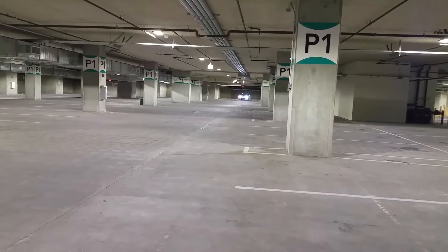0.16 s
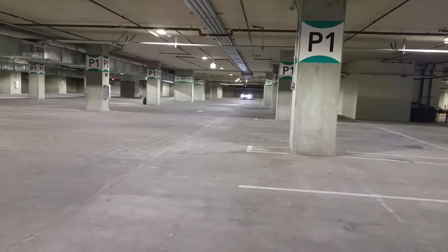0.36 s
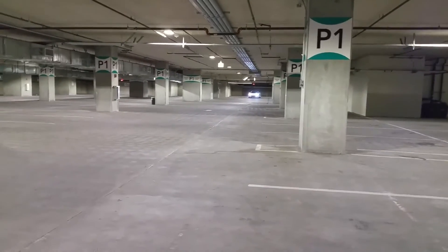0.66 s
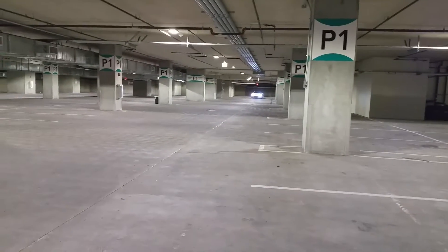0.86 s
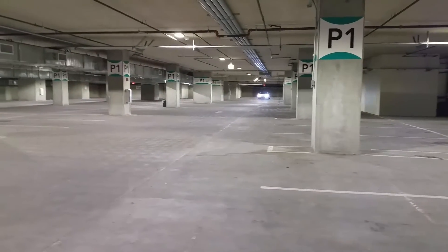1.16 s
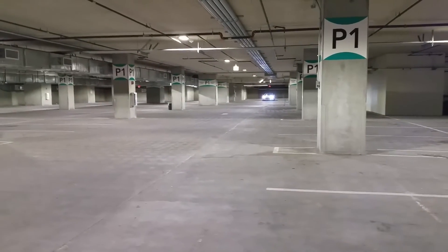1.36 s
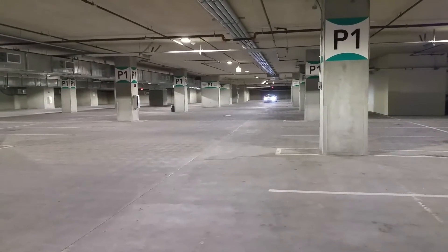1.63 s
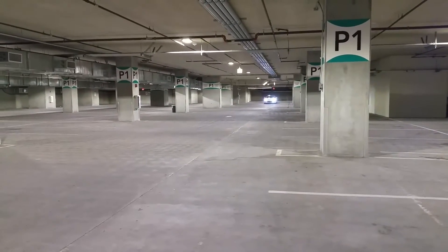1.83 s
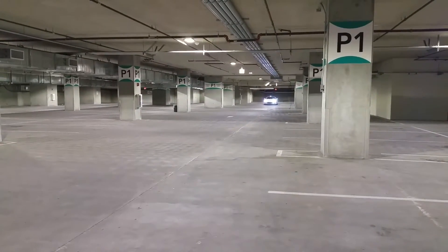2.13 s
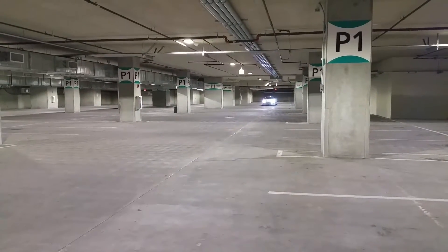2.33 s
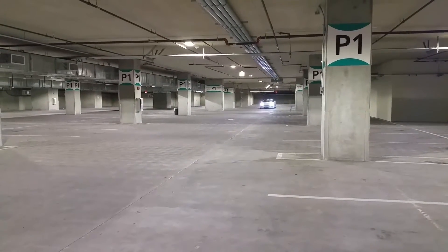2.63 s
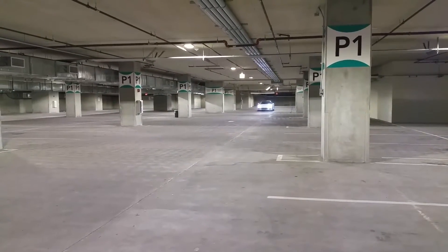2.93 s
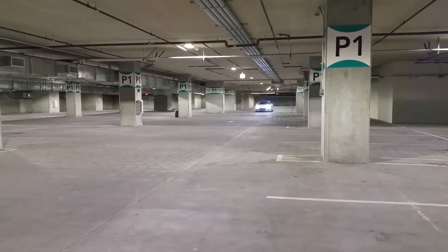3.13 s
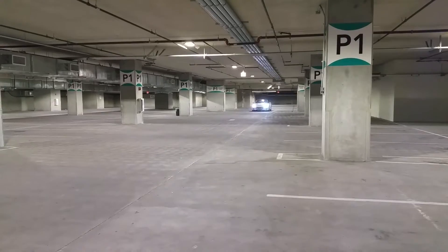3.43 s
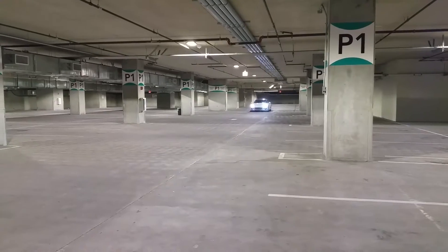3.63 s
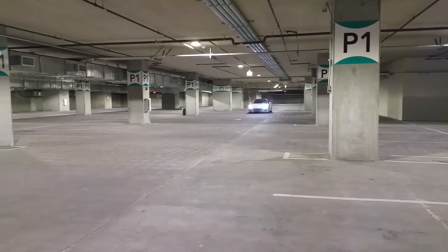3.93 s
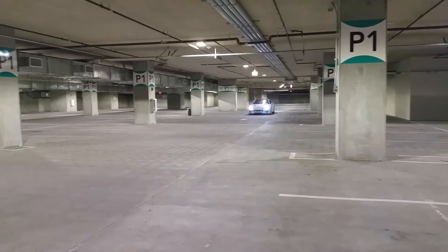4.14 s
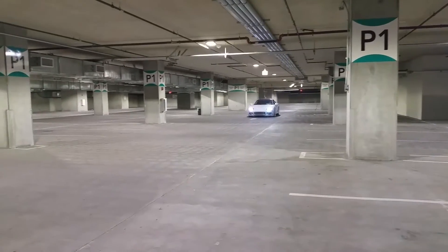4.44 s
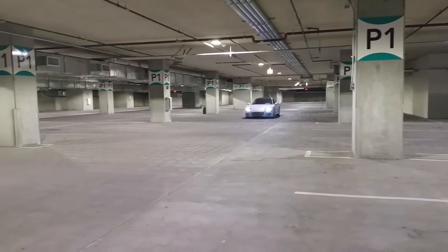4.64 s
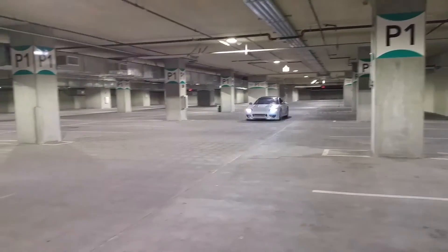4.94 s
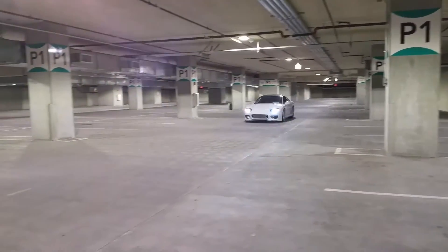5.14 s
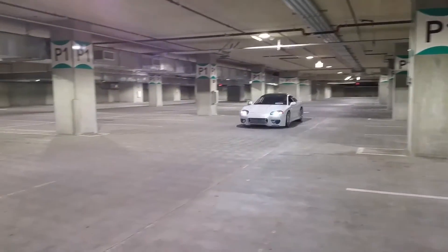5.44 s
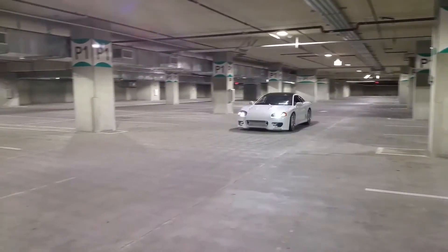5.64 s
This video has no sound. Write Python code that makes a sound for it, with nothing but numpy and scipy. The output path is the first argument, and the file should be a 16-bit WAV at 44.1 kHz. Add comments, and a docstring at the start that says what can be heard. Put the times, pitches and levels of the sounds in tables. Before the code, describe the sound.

In an empty concrete garage, a distant car engine drones low, climbs through first gear, then releases a bright whistling spray of boost. Second gear bites with a throaty cough and faint click, revs climb again, and another brighter whistle follows. The engine falls in pitch while tyre hum and drumming swell close to a stereo microphone amid long echoes.

```python
"""A turbocharged V6 comes down an empty concrete parking garage toward a two-port microphone.
Far off, an unsteady engine speed drives exhaust tones and puffs; tyre roar and rushing air are noise.
It pulls through first gear, and after the lift an escaping jet of boost whistles, sprays and sighs.
Second gear bites with a cough, a faint bright click follows, and the second lift whistles brighter.
Last, tread hum and drumming swell up close; the concrete's long decaying echo washes over the car."""
import sys
import numpy as np
from scipy import signal
from scipy.fft import rfft, irfft
from scipy.io import wavfile
from scipy.ndimage import uniform_filter1d, minimum_filter1d

SR = 44100
rng = np.random.default_rng(int(sys.argv[2]) if len(sys.argv) > 2 else 0)


def persist_wave(psi):
    """Save psi, clipped to +-1, as 16-bit WAV."""
    counts = np.round(np.clip(psi, -1, 1) * 32767).astype(np.int16)
    wavfile.write(sys.argv[1], SR, np.atleast_2d(counts).T)


N = 254853

# Echo of the garage. Each row: frequency in Hz, time to die by 60 dB in seconds.
GARAGE_DECAY = [(60, 3.8), (250, 2.8), (1000, 3.4), (3000, 1.7), (6500, 1.75), (13000, .7)]
# Likeness of diffuse sound at the two ports. Each row: frequency in Hz, likeness from 0 to 1.
PORT_LIKENESS = [(30, .99), (60, .987), (120, .965), (240, .9), (480, .66), (960, .17), (1900, .03),
                 (8000, 0)]
# Treble balance of the microphone ports. Each row: frequency in Hz, left minus right in dB.
PORT_BALANCE = [(60, 1.1), (500, .9), (900, -.5), (1600, -1), (2600, -4.5), (3600, -7.5), (4700, -11),
                (6500, -8), (7500, -5), (8700, -.3), (15000, 0)]
# Loudness curve shared by tyres and exhaust: rises as the car comes, then dips and recovers.
# Each row: time in seconds, relative level in dB.
SHARED_LOUDNESS = [(0, -24), (1.3, -10), (2.5, -1.5), (3.3, 2.5), (3.52, -2), (4.02, 3.5), (4.45, -8.5),
                   (4.72, 0.5), (5.3, -4), (5.78, 3.5)]

# Rushing air. Each row: time in seconds, level in dB.
AIR_LEVEL = [(0, -48), (.6, -42), (1.3, -40), (2.15, -31.5), (2.62, -25), (3.2, -24), (3.55, -30.5),
             (4.15, -26), (4.75, -25.5), (5.35, -30), (5.78, -30)]
# Fine treble hiss, which rises, drops out and returns. Each row: time in seconds, level in dB.
FINE_HISS_LEVEL = [(0, -60), (2.65, -41), (3.3, -54.5), (3.7, -41.5), (4.2, -36.5), (5.78, -41)]
# Spectra of the air and the fine hiss. Each row: frequency in Hz, relative density in dB per Hz.
AIR_COLOUR = [(40, -12), (250, -5.5), (900, -3), (1650, -1), (2200, 2), (2700, -3), (3500, -2), (4500, -4),
              (5500, -6.5), (6300, -11), (7100, -28), (8200, -82), (12000, -61)]
FINE_HISS_COLOUR = [(4000, 15), (7000, 13), (8500, 8.5), (10500, 2), (12000, -1.5), (15500, -10)]

# Hum of the tyre tread, growing as the car comes close. Each row: time in seconds, level in dB.
TREAD_LEVEL = [(0, -87), (4.3, -33.5), (5.1, -30), (5.6, -27.5), (5.78, -29)]
# Spectra of tyre roar, tread hum and the tyres' drumming on the concrete.
# Each row: frequency in Hz, relative density in dB per Hz.
TYRE_COLOUR = [(30, -11), (110, -4), (250, 0), (550, -6), (750, -2.5), (1000, -1.5), (1300, -5.5),
               (1650, -9), (2100, -10), (3000, -20), (8000, -87)]
TREAD_COLOUR = [(400, -48), (650, 2.5), (850, 6), (1050, 7), (1400, -0.5), (2500, -43), (6000, -60)]
DRUM_COLOUR = [(200, -45), (275, -11), (325, -0.5), (410, -9), (500, -36), (4000, -89.5)]
TYRES_DB, DRUM_OVER_TREAD_DB = -23.5, 2.5  # the roar is relative to the shared loudness

# Thin whines, chirps and a faint, nearly steady hum near 1.6 kHz.
# Each row: start in seconds, length in seconds, start pitch in Hz, end pitch in Hz, level halfway in dB,
# swell from start to end in dB, blur as a share of the start pitch.
WHINES = [(0, 1, 5670, 5770, -56.5, 0, 0.051), (0, 1.0, 1620, 1677, -51, 5, 0.11),
          (2.497, 0.098, 4500, 4320, -39, 8, .025), (4.171, 0.14, 1290, 1127, -30, 0, 0.08),
          (4.134, 0.148, 2296, 2178, -32.5, -3, 0.044), (4.796, 0.93, 6820, 6450, -41.5, -10, 0.045),
          (4.88, 0.92, 14300, 7640, -58, 14, 0.052)]
WHINE_FADE_SHARE = .12  # of the length, at each end

# Blow-off whistle, one row a gear change; the top octave is duller from far away.
# Each row: start in seconds, length in seconds, pitch it sinks to in Hz, quick drop as the valve lifts
# in Hz, sinking time in seconds, level before the fade in dB, top octave in dB.
BLOW_OFFS = [(2.572, 0.78, 6155, 439.4, 0.27, -12, -3.5), (4.161, 0.83, 6124, 230.8, .31, -12, 3)]
# Sigh of the escaping air. Each row: frequency in Hz, relative density in dB per Hz.
SIGH_COLOUR = [(2000, -50), (4300, 0), (5700, 3.5), (6400, 1), (7200, 2.5), (8200, -15), (9400, -20),
               (10500, -10.5), (12000, -24), (15500, -44)]
VALVE_OPENS_S, VALVE_CLOSES_S, BOOST_FADE_DB_PER_S = .012, 0.073, 30.5
SNAP_S = 0.021  # the pitch drops fast as the valve lifts
SAG_HZ = 641  # then holds briefly and sinks with the boost pressure
# the valve bounces on its spring and bends the pitch
REBOUND_HZ, REBOUND_PERIOD_S, REBOUND_DIES_S = 102.3, 0.16, 0.254

# Engine speed through first and second gear.
# Each row: time in seconds, mean firing rate of one cylinder bank in Hz.
BANK_RATE = [(0, 25), (.2, 29.5), (.5, 29.5), (.87, 34.5), (1.15, 41.5), (1.45, 49.5), (1.7, 59),
             (1.95, 64), (2.15, 69), (2.52, 86), (2.75, 65), (3.2, 61), (3.55, 65), (3.85, 70.5), (4.1, 76),
             (4.4, 77.5), (4.8, 76.5), (5.08, 70), (5.3, 66), (5.5, 61), (5.78, 52)]
# The throttle, one row a gear. Each row: starts to open in seconds, starts to close in seconds,
# closing time in seconds.
PULLS = [(1.17, 2.245, 0.57), (3.09, 4.15, 0.05)]
THROTTLE_OPENS_S = 0.5

# Tones in the echoing rumble. Each row: multiple of the bank rate, relative level in dB.
ORDER_LEVELS = [(1, 5.5), (2, -5), (3, -8), (4, -6.5), (5, -10.5), (6, -16), (9, -17)]
# Spectrum of the exhaust rumble. Each row: frequency in Hz, relative density in dB per Hz.
EXHAUST_COLOUR = [(20, -39), (38, -42), (52, -12.5), (68, -17), (92, 0.5), (125, 1), (155, 3.5),
                  (195, 11.5), (270, 0), (360, -8), (450, -7), (600, -13), (850, -18.5), (1600, -25.5),
                  (5000, -71)]
# Borders between boom, drone, growl and rasp: frequencies in Hz.
REGISTER_EDGES_HZ = [95, 170, 260]
# Bass boom under the drone. Each row: time in seconds, level in dB.
BOOM_LEVEL = [(0, -43), (.9, -28.5), (1.6, -26.5), (2.4, -34), (2.72, -39), (3.3, -27.5), (4.0, -42),
              (4.35, -48), (4.95, -55), (5.3, -43), (5.78, -38)]
# Drone, growl and rasp above the boom. Each row: base level in dB, share of the shared loudness,
# gain at full throttle in dB.
REGISTERS = [(-27.5, 0.017, 5.5), (-28, 0.43, 3.5), (-25, 0.47, 2.5)]

# The three lowest exhaust tones, at 1, 2 and 3 times the bank rate, swell and dip as the car moves
# through the hall. Each row: time in seconds, mean level in dB.
BANK_TONE = [(0, -70), (1.9, -46), (2.18, -32), (2.55, -27), (2.8, -47), (3.4, -51), (3.75, -24),
             (4.05, -25), (4.3, -36), (4.65, -30), (4.92, -35), (5.1, -25), (5.45, -24.5), (5.7, -21)]
FIRING_TONE = [(0, -30), (.22, -25), (.37, -34), (.46, -17.5), (.61, -29.5), (.7, -21), (.87, -17.5),
               (1.0, -17.5), (1.1, -25), (1.5, -22.5), (1.66, -20.5), (1.97, -16.5), (2.25, -20),
               (2.38, -27), (2.95, -41), (3.2, -24.5), (3.42, -21.5), (3.58, -16.5), (3.85, -18.5),
               (3.98, -27), (4.12, -20), (4.3, -29.5), (4.55, -26), (4.8, -37), (5, -24.5), (5.2, -29),
               (5.78, -52)]
GROWL_TONE = [(0, -65), (1, -37), (1.55, -30.5), (1.9, -26), (2.2, -22), (2.4, -34), (2.9, -26.5),
              (3.3, -41), (3.55, -19), (3.75, -25), (3.93, -19), (4.15, -31), (4.35, -32), (4.6, -27),
              (4.75, -43), (5.78, -33)]
# uneven firing frays each tone: level when coasting, extra at full throttle, spread per multiple
RAGGED_DB, RAGGED_LOAD_DB, RAGGED_HZ = -11, 2.5, 9
SURGE_DB, SURGE_HZ = 1.0, 8

# Bark of the tailpipe as the revs climb under load.
# Each row: frequency in Hz, relative density in dB per Hz.
BARK_COLOUR = [(100, -52), (200, -26), (260, 6.5), (330, -9), (430, -0.5), (520, -4.5), (700, -10.5),
               (1100, -13), (2000, -40), (8000, -96)]
# level at full throttle and this bank rate, and its slope with the rate
BARK_DB, BARK_FULL_HZ, BARK_DB_PER_HZ = -24.5, 74, 0.52
COUGH_AT_S, COUGH_S, COUGH_DB = 3.27, 0.064, -26.5

TIME = np.arange(N) / SR
BINS = np.fft.rfftfreq(N, 1 / SR)  # Hz


def gain_of(db):
    """Decibels to amplitude."""
    return 10 ** (np.asarray(db) / 20)


def evened(x):
    """Scales to rms 1."""
    return x / np.sqrt(np.mean(x ** 2) + 1e-20)


def read(points, hz):
    """Reads a spectrum table on a log-frequency axis."""
    f, value = np.transpose(points)
    return np.interp(np.log(hz + 1), np.log(f + 1), value)


def curves(rows):
    """The columns of a time table, one value a sample."""
    s, *columns = np.transpose(rows)
    return [np.interp(TIME, s, c) for c in columns]


def ramp(start, seconds):
    """Rises from 0 to 1, beginning at start."""
    return np.clip((TIME - start) / seconds, 0, 1)


def coloured(x, points):
    """Filters by a spectrum table."""
    return irfft(rfft(x) * gain_of(read(points, BINS)), N)


def wander(hz):
    """Smooth chance of rms 1, mostly slower than hz."""
    return evened(irfft(rfft(rng.standard_normal(N)) / (1 + (BINS / hz) ** 4), N))


def fuzzy(phase, width_hz):
    """A narrow band of turbulence around a gliding tone, rms about 1."""
    return wander(width_hz) * np.sin(phase) + wander(width_hz) * np.cos(phase)


def steadied(x, seconds):
    """Takes the slow swells out of a stereo sound, leaving rms about 1."""
    power = uniform_filter1d((x ** 2).mean(0), max(int(seconds * SR), 1))
    return x / np.sqrt(abs(power) + 1e-12)


def diffuse():
    """Noise from all sides: alike at both ports in the bass, unrelated in the treble."""
    left, other = rfft(rng.standard_normal((2, N)))
    same = np.clip(read(PORT_LIKENESS, BINS), -1, 1)
    right = same * left + np.sqrt(1 - same ** 2) * other
    return irfft(np.array([left, right]), N)


def garage(x, direct_db):
    """The straight path plus a dense tail in which each band dies at its own speed."""
    hz, t, z = signal.stft(diffuse()[:, :2 * SR], SR, nperseg=512)
    decay_db = -60 * t / read(GARAGE_DECAY, hz)[:, None]
    tail = signal.istft(z * gain_of(decay_db), SR, nperseg=512)[1]
    tail = tail / np.linalg.norm(tail[0])
    echo = signal.fftconvolve(x[None], tail, axes=1)[:, :N]
    direct = gain_of(direct_db)
    return (direct * x + echo) / np.sqrt(1 + direct ** 2)


def rush(colour, level_db):
    """A turbulent roar that the concrete has scattered to all sides."""
    flutter_db = .3 * wander(14)
    return evened(coloured(diffuse(), colour)) * gain_of(level_db + flutter_db)


def air():
    """Rushing air and a fine treble hiss, both noise from all sides."""
    rushing = rush(AIR_COLOUR, curves(AIR_LEVEL)[0])
    return rushing + rush(FINE_HISS_COLOUR, curves(FINE_HISS_LEVEL)[0])


def tyres():
    """A broad roar all the way; tread hum and drumming on the concrete once the car is close."""
    roar = rush(TYRE_COLOUR, TYRES_DB + curves(SHARED_LOUDNESS)[0])
    tread_db = curves(TREAD_LEVEL)[0]
    tread = evened(coloured(rng.standard_normal(N), TREAD_COLOUR)) * gain_of(tread_db)
    drumming = rush(DRUM_COLOUR, tread_db + DRUM_OVER_TREAD_DB)
    return roar + garage(tread, direct_db=-4.0) + drumming


def click(s=3.407, level_db=-33, ring_s=0.00054):
    """A faint bright click: a tiny burst of high noise without echo."""
    age = TIME - s
    snap = (age >= 0) * np.exp(-abs(age) / ring_s) * rng.standard_normal(N)
    return gain_of(level_db) * coloured(snap, [(2000, -17), (7000, 5), (15000, -3)])


def whine(start, length, from_hz, to_hz, level_db, swell_db, spread):
    """A thin tone blurred into a narrow band of noise: fades in, glides, fades out."""
    along = ramp(start, length)
    hz = from_hz + (to_hz - from_hz) * along
    fade = np.minimum(np.minimum(along, 1 - along) / WHINE_FADE_SHARE, 1)
    size = fade * gain_of(level_db + swell_db * (along - .5))
    return size * fuzzy(2 * np.pi * np.cumsum(hz) / SR, spread * from_hz)


def blow_off(start, length, rest_hz, snap_hz, sag_s, level_db, top_db,
             spray_db=-2, overtone_db=-27, sigh_db=-15, spray_rise_s=0.094):
    """Boost escapes over the valve edge: a whistle breaking up into spray, its octave and a broad sigh."""
    age = np.maximum(TIME - start, 0)
    hz = rest_hz + snap_hz * np.exp(-(age / SNAP_S) ** 2) + SAG_HZ / (1 + (age / sag_s) ** 2)
    hz -= REBOUND_HZ * np.exp(-age / REBOUND_DIES_S) * np.sin(2 * np.pi * age / REBOUND_PERIOD_S)

    closing = ramp(start + length - VALVE_CLOSES_S, VALVE_CLOSES_S)
    opening = ramp(start, VALVE_OPENS_S) * (1 - closing)
    gusts_db = 2.2 * wander(18)
    size = opening * gain_of(level_db + gusts_db - BOOST_FADE_DB_PER_S * age)

    breakup = 1 - np.exp(-age / spray_rise_s)
    jitter = breakup * (.009 * wander(90) + .007 * wander(14))
    phase = 2 * np.pi * np.cumsum(hz * (1 + jitter)) / SR
    whistle = evened(gain_of(3 * wander(60))) * np.sin(phase)
    spray = gain_of(spray_db) * breakup * fuzzy(phase * .978, width_hz=260)
    # the octave only sounds while the jet is strong
    strength = np.sqrt(breakup * abs(size) / size.max())
    octave = gain_of(overtone_db) * strength * fuzzy(2 * phase, width_hz=300)
    sigh = gain_of(sigh_db) * evened(coloured(rng.standard_normal(N), SIGH_COLOUR))
    jet = size * (whistle + spray + octave + sigh)
    return coloured(jet, [(8000, 0.0025), (12000, top_db)])


def throttle():
    """0 coasting, 1 pulling hard: opens, holds and closes once a gear."""
    load = np.zeros(N)
    for opens, closes, closing_s in PULLS:
        load += ramp(opens, THROTTLE_OPENS_S) * (1 - ramp(closes, closing_s))
    return load


def tailpipe(turns, uneven_db=-15, puff_length=0.66):
    """Tones of the firing banks, weaker ones from unequal cylinders, and a turbulent puff a firing."""
    tones = np.zeros(N)
    for k in range(3, 28):
        order = k / 3  # thirds of the bank rate: three cylinders a bank
        level_db = read(ORDER_LEVELS, order) + (0 if order.is_integer() else uneven_db)
        tones += gain_of(level_db) * np.sin(2 * np.pi * (order * turns + rng.random()))
    puffs = np.exp(-(2 * turns % 1) / puff_length) * rng.standard_normal(N)
    return evened(tones) + gain_of(10.5) * evened(puffs)


def exhaust_rumble(turns):
    """Echoes lag in pitch and beat against the engine, split by pitch into four registers."""
    rest = rfft(coloured(garage(tailpipe(turns), direct_db=-10), EXHAUST_COLOUR))
    registers = []
    for edge_hz in REGISTER_EDGES_HZ:
        below = rest / (1 + (BINS / edge_hz) ** 16)
        registers.append(below)
        rest = rest - below
    registers.append(rest)

    # the boom has its own level curve; drone, growl and rasp follow throttle and shared loudness
    loudness_db, load = curves(SHARED_LOUDNESS)[0], throttle()
    levels_db = curves(BOOM_LEVEL)
    for db, share, pull_db in REGISTERS:
        levels_db.append(db + share * loudness_db + pull_db * load)
    return sum(steadied(irfft(z, N), seconds=0.29) * gain_of(db) for z, db in zip(registers, levels_db))


def bark(turns):
    """A throaty roar, one coarse puff a bank firing: grows with throttle and revs, coughs as a gear bites."""
    level_db = BARK_DB + BARK_DB_PER_HZ * (curves(BANK_RATE)[0] - BARK_FULL_HZ)
    cough = gain_of(COUGH_DB) * np.exp(-((TIME - COUGH_AT_S) / COUGH_S) ** 2)
    size = gain_of(level_db) * np.sqrt(throttle()) + cough
    puffs = np.exp(-(turns % 1) / .45) * (rng.standard_normal(N) + .25)
    roar = evened(coloured(puffs - puffs.mean(), BARK_COLOUR))
    return garage(roar * size, direct_db=7)


def exhaust_tones(turns):
    """The low notes of the tailpipe, ragged under load, surging and beating against their own echo."""
    ragged = gain_of(RAGGED_DB + RAGGED_LOAD_DB * throttle())
    tones = np.zeros((2, N))
    for order, level in enumerate([BANK_TONE, FIRING_TONE, GROWL_TONE], 1):
        phase = 2 * np.pi * (order * turns + rng.random())
        tone = np.sqrt(2) * np.sin(phase) + ragged * fuzzy(phase, order * RAGGED_HZ)
        level_db = curves(level)[0] + SURGE_DB * wander(SURGE_HZ)
        tones += steadied(garage(tone, direct_db=5.5), seconds=.22) * gain_of(level_db)
    return tones


def exhaust():
    """One slightly unsteady engine speed drives the direct tones, their rumbling echo and the bark."""
    rate_hz = curves(BANK_RATE)[0] * (1 + .011 * wander(9))
    turns = np.cumsum(rate_hz) / SR  # firings of one bank so far
    return exhaust_tones(turns) + exhaust_rumble(turns) + bark(turns)


def scene():
    """Air, tyres, a faint click, thin whines, the blow-off valve and the exhaust of the approaching car."""
    whines = garage(sum(whine(*row) for row in WHINES), direct_db=4)
    valve = garage(sum(blow_off(*row) for row in BLOW_OFFS), direct_db=1)
    return air() + tyres() + click() + whines + valve + exhaust()


def record(dry):
    """The colour of each microphone port, a peak limiter, then the band limit."""
    balance_db = np.outer([.5, -.5], read(PORT_BALANCE, BINS))
    ports = irfft(rfft(dry) * gain_of(balance_db), N)
    allowed = .93 / np.maximum(abs(ports).max(0), .93)
    limited = ports * uniform_filter1d(minimum_filter1d(allowed, size=400), size=400)
    lowpass = signal.firwin(511, 15750, window=("kaiser", 9), fs=SR)  # edge in Hz
    return signal.oaconvolve(limited, lowpass[None], "same")


dry = scene()
out = record(dry)
persist_wave(out)
```